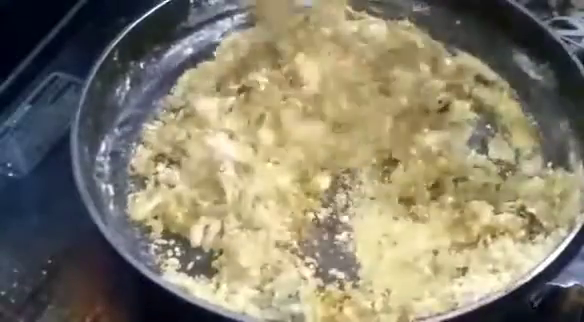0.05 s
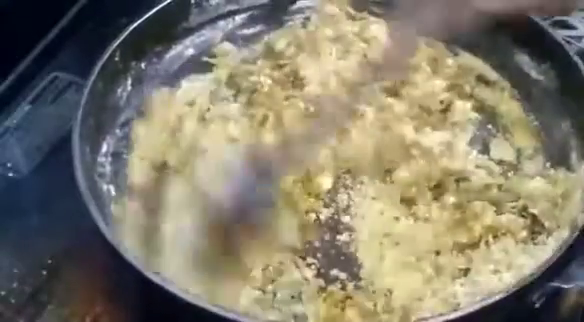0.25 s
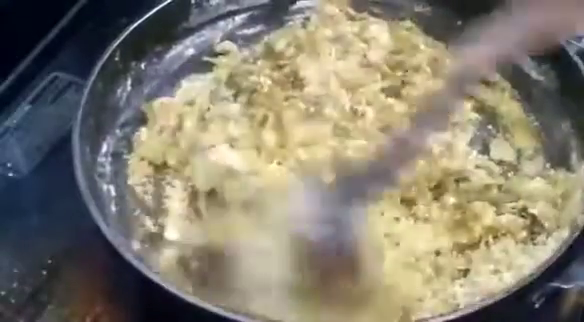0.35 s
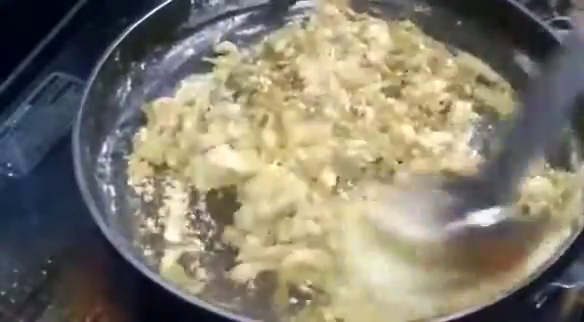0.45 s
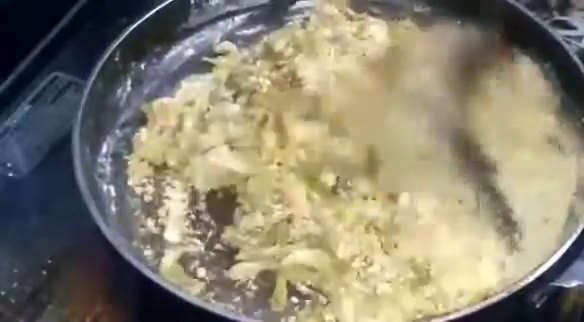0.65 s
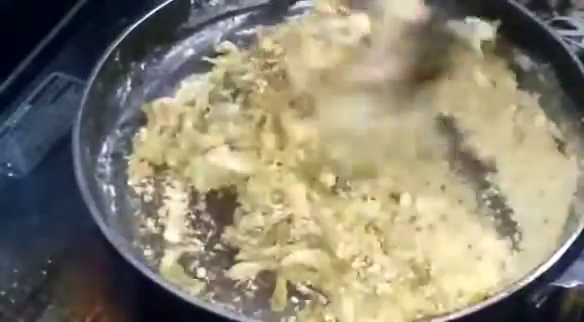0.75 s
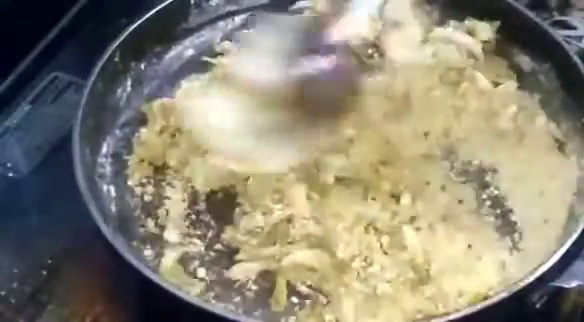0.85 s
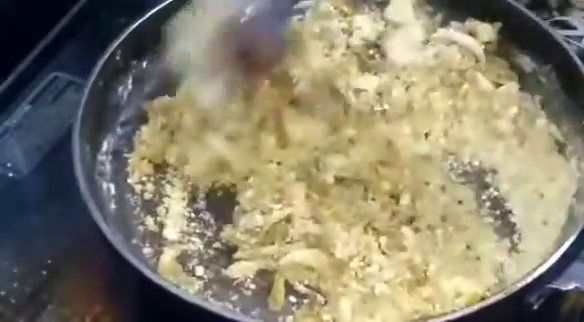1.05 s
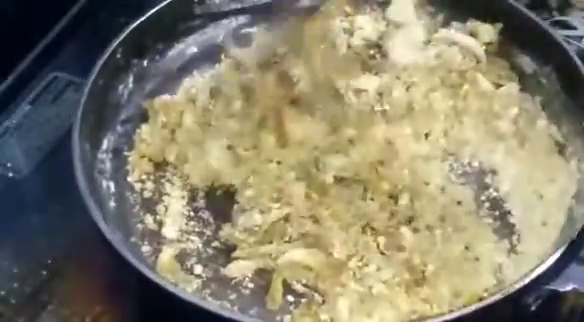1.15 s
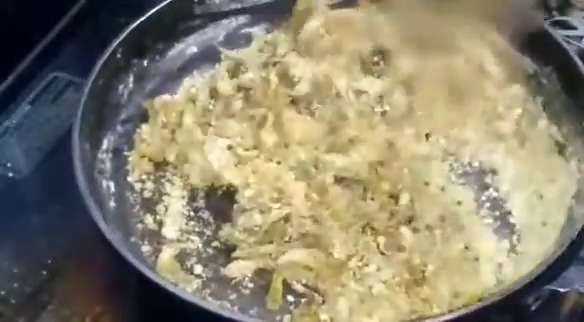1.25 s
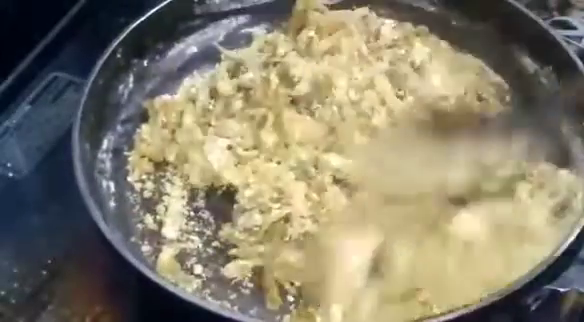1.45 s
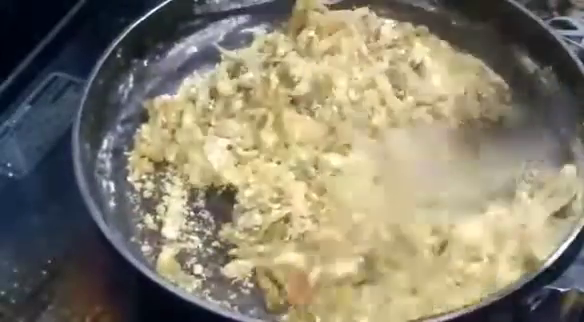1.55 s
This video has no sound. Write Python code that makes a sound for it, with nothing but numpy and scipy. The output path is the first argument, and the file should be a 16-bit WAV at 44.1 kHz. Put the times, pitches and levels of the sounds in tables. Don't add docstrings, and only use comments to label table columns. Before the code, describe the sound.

A metal spatula strikes a frying pan at 0.24 s with a loud, short, damped clank, then scrapes the bottom from about 0.4 to 0.65 s, strongest near 0.57 and brighter at the end. Barely audible soft flour lumps fall; the flame breathes faintly at 0.9. Lighter knocks at 1.03 and 1.24 accompany a weaker scrape fading by 1.4. Short kitchen echo, low hum, faint hiss.

```python
import sys
import numpy as np
from scipy import signal
from scipy.fft import rfft, irfft
from scipy.io import wavfile
from scipy.ndimage import uniform_filter1d

SR = 44100
rng = np.random.default_rng(int(sys.argv[2]) if len(sys.argv) > 2 else 0)


def materialize(psi):
    bounded = np.clip(np.atleast_2d(psi).T, -1, 1)
    quanta = np.round(bounded * 32767).astype(np.int16)
    wavfile.write(sys.argv[1], SR, quanta)


def gain_from_decibels(decibels):
    exponent = np.asarray(decibels, float) / 20
    return 10 ** exponent


N = 70560


def evened(x):
    return x / np.sqrt(np.mean(x ** 2) + 1e-20)


def read(points, hz):
    f, value = np.transpose(points)
    return np.interp(np.log(hz + 1), np.log(f + 1), value)


def coloured(points, size):
    hz = np.fft.rfftfreq(size, 1 / SR)
    spectrum = rfft(rng.standard_normal(size)) * gain_from_decibels(read(points, hz))
    return evened(irfft(spectrum, size))


def shifting(x, answers, step_s):
    turn = np.arange(N) / SR / step_s
    count = len(answers)
    out = np.zeros(N)
    for k, answer in enumerate(answers):
        gap = abs((turn - k + count / 2) % count - count / 2)
        fade = np.cos(np.pi / 2 * np.minimum(gap, 1))
        out += signal.oaconvolve(x * fade, answer)[:N]
    return out


def utensils():
    # (t/s, level/dB, chatter length/s, hardness/dB, place 0-3)
    blows = [(0.2369, -50, 0.0037, 10, 1.5), (.2390, -11.5, .005, -10.5, 0), (.2440, -12, .008, -18, 0.5),
             (1.0292, -24.5, 0.0035, -4.5, 2), (1.033, -27.5, .016, -4.5, 2),
             (1.2401, -30.5, 0.0047, -1.5, 3), (1.2447, -29, 0.019, -4, 3), (.03, -60, 0.011, -42, 3),
             (0.154, -67.5, 0.011, -47, 3), (.866, -54.5, 0.017, -40, 3), (0.945, -55, 0.0095, -37, 3)]
    # (t/s, pressure/dB, speed -1 slow..1 fast, blade hiss/dB)
    first_scrape = [
        (.39, -62, -0.14, 4),
        (.42, -56.5, -0.59, -2),
        (.47, -54, -0.13, 1),
        (.503, -70, -0.43, 0),
        (.52, -41.5, -0.48, -6),
        (.565, -38, -0.19, -5.5),
        (.59, -38.5, 0.61, 1),
        (.632, -43.5, 0.93, 3),
        (.655, -70, .5, -19),
    ]
    second_scrape = [
        (1.04, -53, 0, -6),
        (1.075, -44, 0.14, -1),
        (1.105, -43, 0.35, -2),
        (1.135, -50, 0.15, -10),
        (1.17, -53.5, 0, -3),
        (1.23, -53.5, 0, 0),
        (1.27, -60.5, 0.047, 5.5),
        (1.32, -61, 0, -1),
        (1.39, -68, 0, -9),
    ]
    # (f/Hz, t60/s, then level/dB when touched at place 0, 1, 2, 3)
    pan_modes = [(439.7, 0.11, -5, -12.5, 0, -0.5), (639, .05, -9.5, -8, -8.5, -26),
                 (685, 0.078, 3, 2, -9, -17), (725, 0.073, -5, -6, -17, -2),
                 (898, .05, -25.5, -5, -12.5, -1), (1082.5, 0.057, -3.5, -4, -6.5, -1.5),
                 (1224, 0.032, -28, -1, -1, -23), (1492, 0.038, -21, -3.5, -2, -8),
                 (1651, 0.061, -6.5, -4, -2, -0.5), (1749, 0.041, -0.5, -5.5, -19, -18),
                 (1862, .06, -11, -8.5, -3.5, -27), (2158, .045, -4.5, -10.5, -28, -10),
                 (2362, .05, -8, -7.5, -14, -36), (2590, 0.065, -6, -11.5, -12, -10)]
    # (f/Hz, t60/s, level/dB)
    blade_modes = [(3022, .05, -9), (3510, .04, -4), (3726, .05, -6.5), (4140, .035, -8.5),
                   (4840, 0.042, -6.5), (5860, 0.078, -7.5), (6700, 0.024, -4.5), (7460, 0.052, -2.5),
                   (7920, 0.052, 4.5), (8140, .05, 1), (8660, 0.061, 1), (8920, .04, -3.5),
                   (9650, .04, -24), (10700, 0.012, -18)]
    # (f/Hz, level/dB)
    pan_crowd = [(200, -24), (330, -19), (450, -0.5), (900, -3.5), (1400, -2), (2200, 0.5), (3000, -6.5),
                 (4500, -18.5)]
    blade_crowd = [(2000, -44), (3500, -16), (5300, -10), (7000, -3), (8200, 3.5), (9600, -6.5),
                   (12000, -11.5), (16000, -11.5)]
    move_s = 0.012

    forces = [(place, knock(*blow)) for *blow, place in blows]
    forces += [(1, stroke(first_scrape)), (2, stroke(second_scrape))]
    on_pan, on_blade = np.zeros((4, N)), np.zeros(N)
    for place, (pan_force, blade_force) in forces:
        on_pan[int(round(place))] += pan_force
        on_blade += blade_force

    blade_spots = [ring(blade_modes, blade_crowd, crowd_db=-0.5, crowd_t60=0.0069) for _ in range(8)]
    out = shifting(on_blade, blade_spots, move_s)
    for place, force in enumerate(on_pan):
        modes = [(m[0], m[1], m[2 + place]) for m in pan_modes]
        pan_spots = [ring(modes, pan_crowd, crowd_db=-1.5, crowd_t60=0.019) for _ in range(5)]
        out += shifting(force, pan_spots, move_s)
    return out


def knock(s, db, length_s, hard_db):
    bounces_per_s, bounce_fade_db, first_db, blow_db = 2500, -7.5, 3, 16.5
    u = np.arange(2000) / SR / length_s
    luck = rng.random((2000, 2))
    bounces = luck[:, 0] < bounces_per_s / SR
    strength = 2 * luck[:, 1] - 1
    burst = bounces * strength * (u < 1) * gain_from_decibels(bounce_fade_db * u)
    burst[0] = gain_from_decibels(first_db)

    at, force = round(s * SR), np.zeros(N)
    force[at:at + len(u)] = burst / np.linalg.norm(burst) * gain_from_decibels(db + blow_db)
    if hard_db < -25:
        force = 4 * signal.sosfilt(signal.butter(3, 1070, fs=SR, output="sos"), force)
    return force, force * gain_from_decibels(hard_db)


def stroke(curve):
    slips_per_s, slip_spread_db, judder_db = 5000, 4, 1.26
    split_hz, speed_db = 2100, 6
    s, pressure_db, speed, hiss_db = np.transpose(curve)
    t = np.arange(N) / SR
    slipping = rng.random(N) < slips_per_s / SR
    direction = rng.choice([-1., 1.], N)
    size = gain_from_decibels(slip_spread_db * np.minimum(rng.exponential(1, N), 4))
    slips = evened(slipping * direction * size)

    judder = evened(uniform_filter1d(rng.standard_normal(N), size=300))
    slips *= gain_from_decibels(np.interp(t, s, pressure_db, -120, -120) + judder_db * judder)

    dull = signal.sosfilt(signal.butter(2, split_hz, fs=SR, output="sos"), slips)
    lean = gain_from_decibels(speed_db * np.interp(t, s, speed))
    on_pan = dull / lean + (slips - dull) * lean
    return on_pan, slips * gain_from_decibels(np.interp(t, s, hiss_db))


def ring(modes, crowd, crowd_db, crowd_t60):
    t = np.arange(6000) / SR
    clear = np.zeros(len(t))
    for hz, t60, db in modes:
        level_luck, pitch_luck = rng.standard_normal(2)
        decay = gain_from_decibels(db + 2.5 * level_luck - 60 * t / t60)
        tone = np.sin(2 * np.pi * hz * (1 + 0.0048 * pitch_luck) * t)
        clear += decay * tone / np.sqrt(t60)
    dense = coloured(crowd, size=len(t)) * gain_from_decibels(-60 * t / crowd_t60)
    both = clear / np.linalg.norm(clear) + gain_from_decibels(crowd_db) * dense / np.linalg.norm(dense)
    return both / np.linalg.norm(both)


def kitchen(x):
    return shifting(x, [echo() for _ in range(8)], step_s=0.006)


def echo():
    # (f/Hz, t60/s)
    room_decay = [(250, .4), (600, 0.48), (1500, 0.51), (3000, 0.44), (6000, 0.44), (12000, 0.36)]
    # (delay/s, level/dB)
    walls = [
        (.0045, -12),
        (.009, -12.5),
        (.016, -13),
        (.024, -12),
    ]
    taps = np.zeros(SR // 2 + 8000)
    at = np.arange(400, len(taps) - 20, 20)
    taps[at + rng.integers(0, 20, len(at))] = rng.choice([-1., 1.], len(at))

    hz, t, z = signal.stft(taps, SR, nperseg=256)
    decay = gain_from_decibels(-60 * t / read(room_decay, hz)[:, None])
    tail = signal.istft(z * decay, SR, nperseg=256)[1]
    tail *= gain_from_decibels(-6.5) / np.linalg.norm(tail)
    for s, db in walls:
        tail[round(s * rng.uniform(.9, 1.1) * SR)] += gain_from_decibels(db)
    return tail


def background():
    # (f/Hz, width/Hz, level/dB)
    burner = [
        (436, 37, -66.5),
        (1770, 110, -79.5),
    ]
    flare_notes = [
        (1815, 86, -68.5),
        (4530, 1100, -74.5),
    ]
    # (f/Hz, level/dB per Hz)
    hum = [(20, 0), (42, -11), (68, 0.5), (130, -7), (220, -4.5), (310, -14.5), (1000, -16.5), (2500, -33)]
    hiss = [(1470, -51), (2500, -5), (2990, -14.5), (4310, -17.5), (5870, -19.5), (8330, -4), (10800, -20),
            (15200, -14), (16000, -9.5)]
    flare_s, flare_length_s = 0.915, 0.11

    swell = gain_from_decibels(1.55 * evened(uniform_filter1d(rng.standard_normal(N), size=1500)))
    out = gain_from_decibels(-61.5) * coloured(hum + [(2600, -82)], size=N) * swell
    out += gain_from_decibels(-66.5) * coloured([(2400, -83)] + hiss, size=N)
    flare = np.exp(-((np.arange(N) / SR - flare_s) / flare_length_s) ** 2)
    out += swell * sum(whistle(*row) for row in burner)
    return out + flare * sum(whistle(*row) for row in flare_notes)


def whistle(hz, width_hz, db):
    b, a = signal.iirpeak(hz, hz / width_hz, SR)
    return gain_from_decibels(db) * evened(signal.lfilter(b, a, rng.standard_normal(N)))


def scene():
    pan_bass = signal.butter(5, 373, "highpass", fs=SR, output="sos")
    near = signal.sosfilt(pan_bass, utensils())
    return np.tile(near + kitchen(near) + background(), (2, 1))


def roll_off(x):
    return signal.sosfilt(signal.butter(12, 16810, fs=SR, output="sos"), x)


def record(dry):
    # (f/Hz, side level/dB)
    side_treble = [(3000, -70), (4300, -16.5), (5500, -9), (7500, -42), (9500, -19), (12000, -3),
                   (14000, -7.5), (16000, -12)]
    hz = np.fft.rfftfreq(N, 1 / SR)
    delayed = np.roll(dry[0], 37)
    side = irfft(rfft(delayed) * gain_from_decibels(read(side_treble, hz)), N)
    wide = dry + gain_from_decibels(-3.5) * np.array([side, -side])
    band_limit = signal.firwin(511, 16050, window=("kaiser", 9), fs=SR)
    mix = signal.oaconvolve(wide, band_limit[None], "same")
    return roll_off(mix)


dry = scene()
out = record(dry)
materialize(out)
```